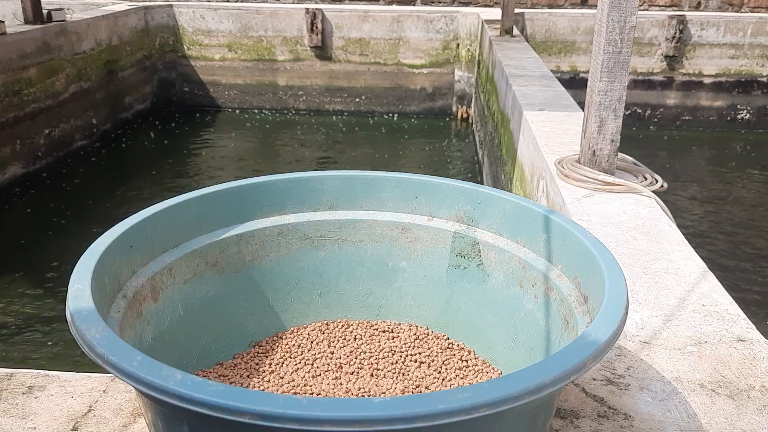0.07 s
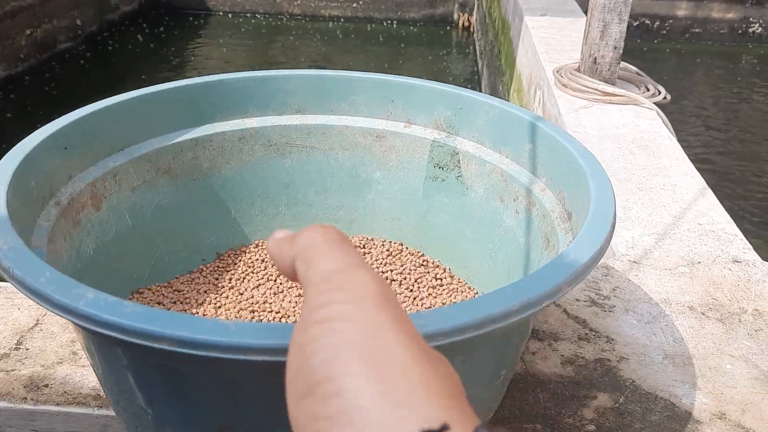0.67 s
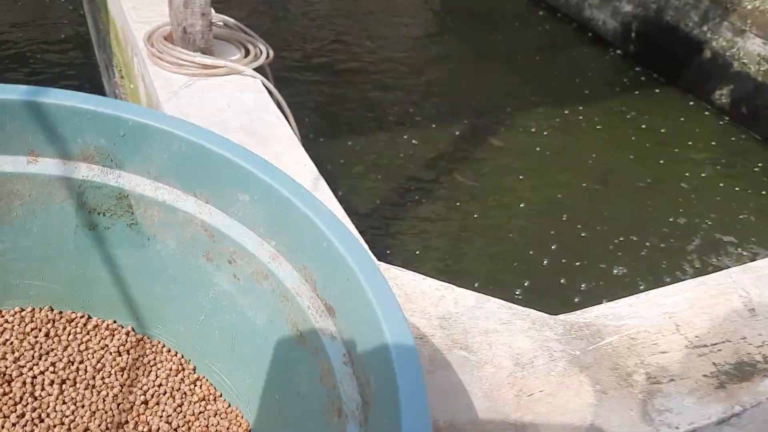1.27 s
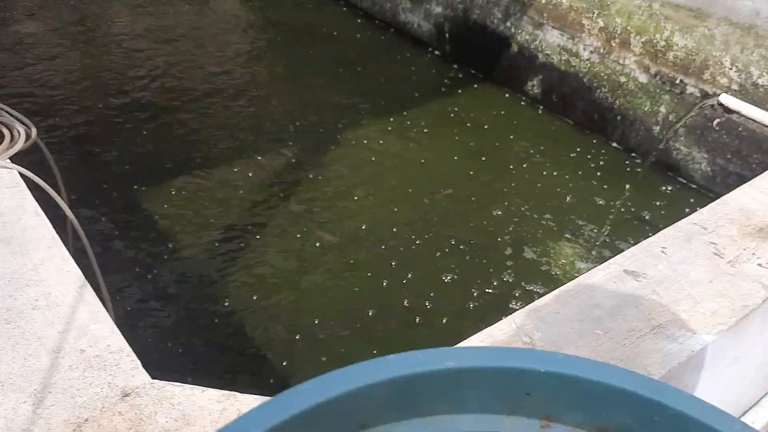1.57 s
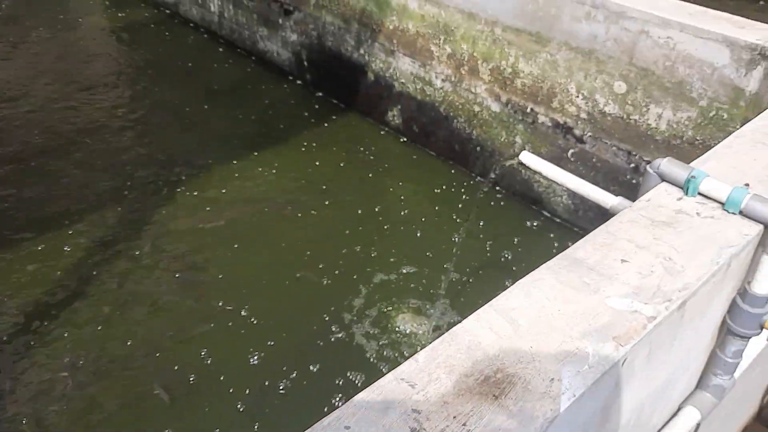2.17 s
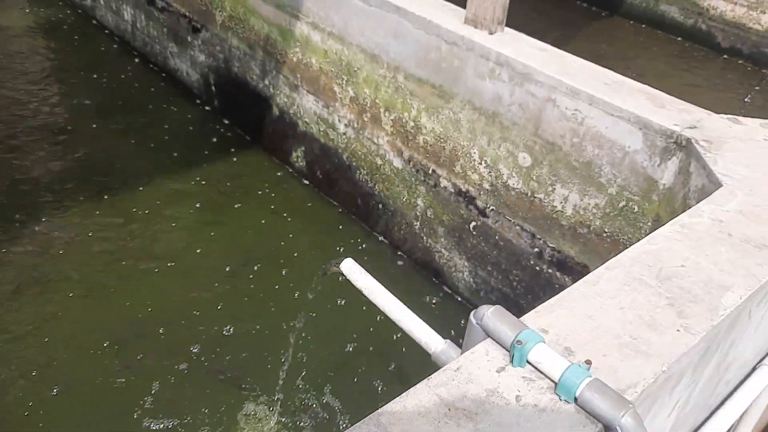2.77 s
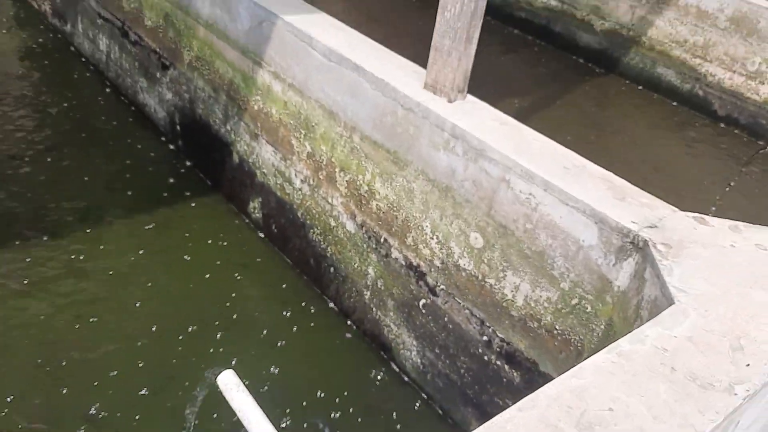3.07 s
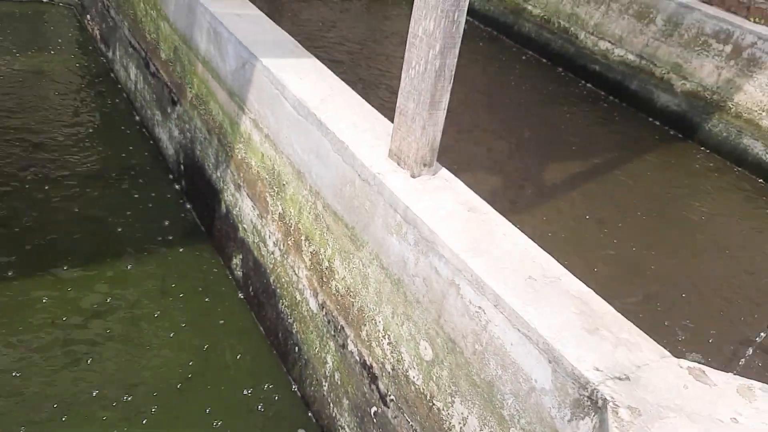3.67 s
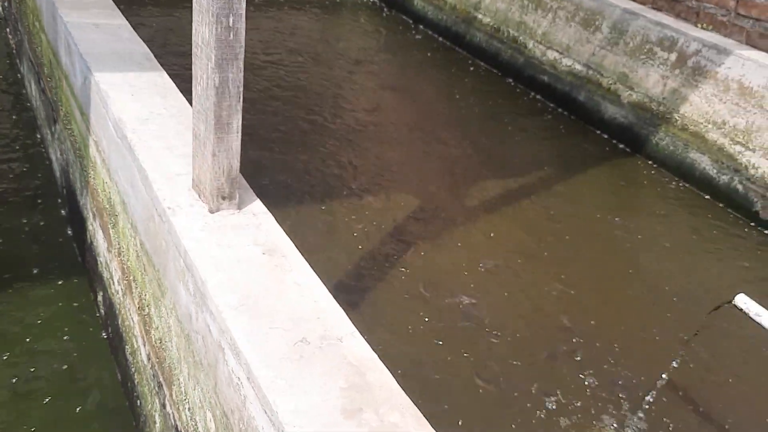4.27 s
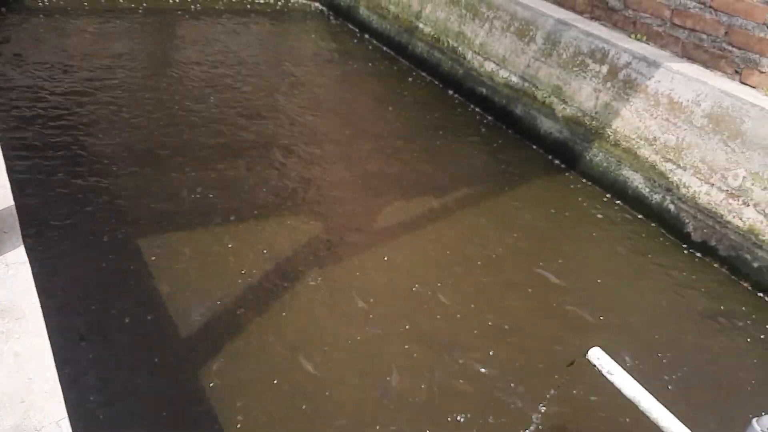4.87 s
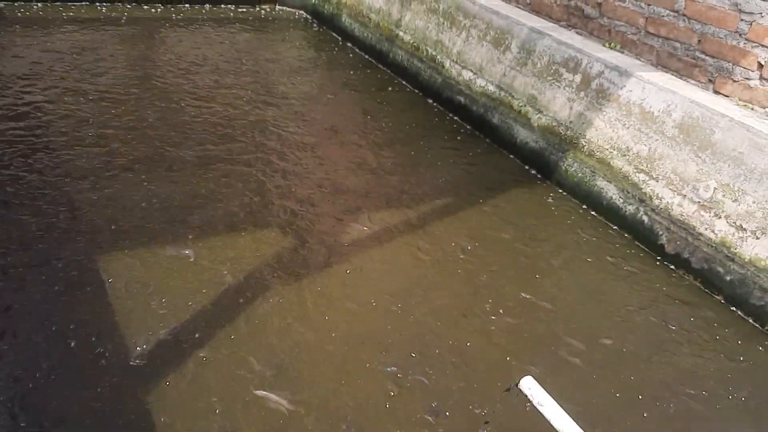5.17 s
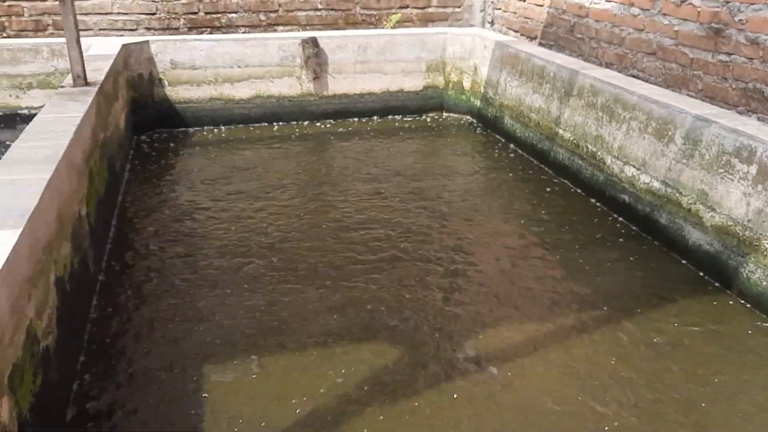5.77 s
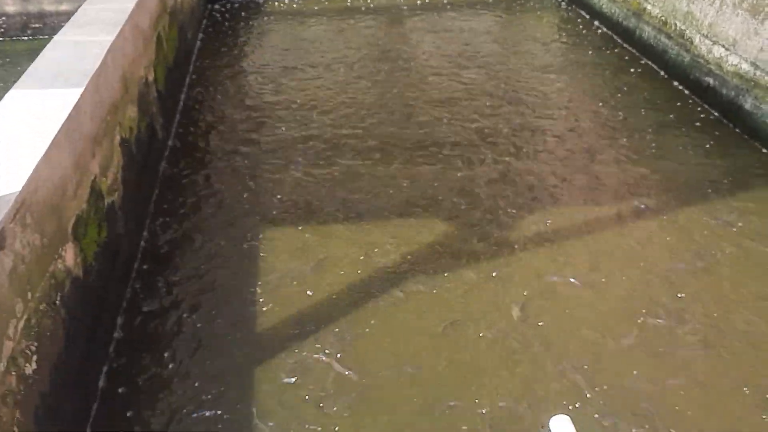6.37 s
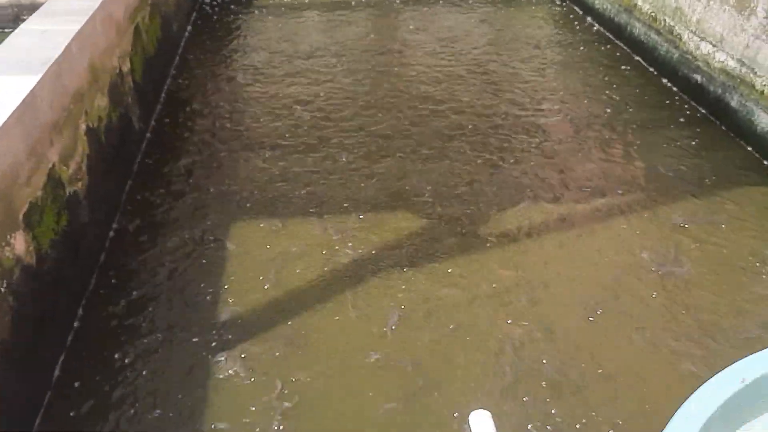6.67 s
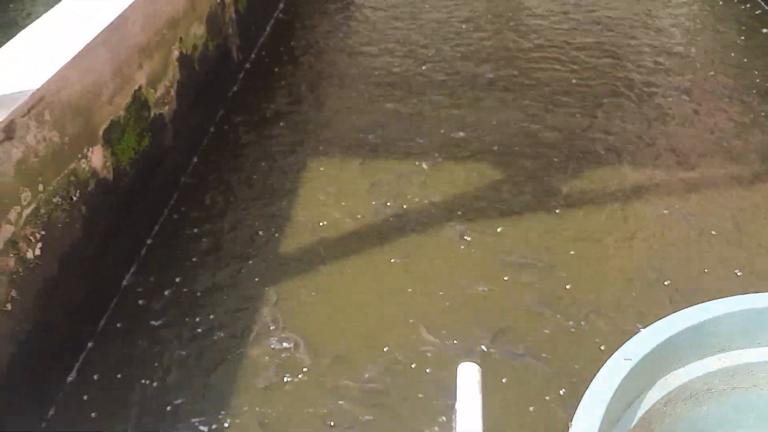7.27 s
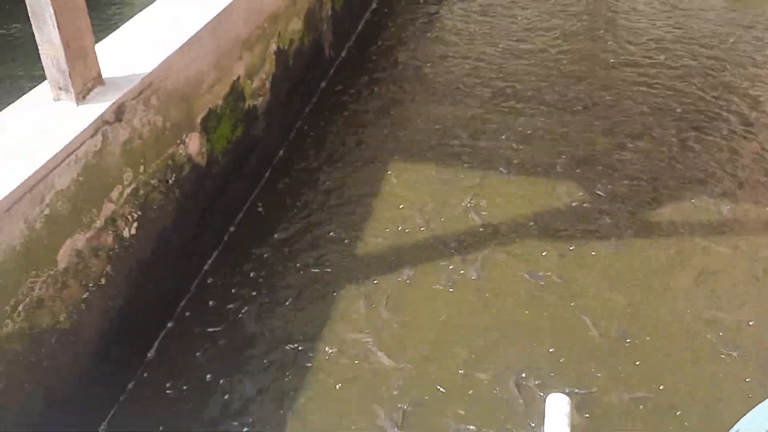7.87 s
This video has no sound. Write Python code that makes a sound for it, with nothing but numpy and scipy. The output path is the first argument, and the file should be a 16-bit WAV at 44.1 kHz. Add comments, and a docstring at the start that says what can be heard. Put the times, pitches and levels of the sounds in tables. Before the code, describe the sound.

Water splatters steadily onto outdoor fish ponds, with small plops from feeding fish, a few sparrow chirps and light wind.

```python
"""Outdoor concrete fish ponds

Thin jets from supply pipes patter and churn on the water, and feeding fish plop and slap at the surface.
A sparrow close by chirps three times between the walls; fainter birds call and pumps hum further off.
A hand bumps a plastic feed basin. The phone is carried from a sheltered spot out over the ponds,
where light wind catches mostly the right one of its two microphones."""
import sys
import numpy as np
from scipy import signal
from scipy.fft import rfft, irfft
from scipy.io import wavfile
from scipy.ndimage import map_coordinates

SR = 44100
rng = np.random.default_rng(int(sys.argv[2]) if len(sys.argv) > 2 else 0)


def generate_wav(sig):
    """Save sig (samples, or channels by samples) to the path in sys.argv[1] as 16-bit PCM at SR."""
    pcm = np.round(np.clip(np.atleast_2d(sig).T, -1, 1) * 32767).astype(np.int16)
    wavfile.write(sys.argv[1], SR, pcm)


N = 348831
T = np.arange(N) / SR


def undb(db):
    """Turn decibels into a number to multiply by."""
    return 10 ** (np.asarray(db) / 20)


def unit(x):
    """Scale a sound to an average power of 1."""
    return x / np.sqrt(np.mean(x ** 2))


def curves(table):
    """Join the rows of a table with straight lines in time, giving one curve per value column."""
    times, *columns = np.transpose(table)
    return [np.interp(T, np.sort(times), column) for column in columns]


def add(track, start_s, sound):
    """Mix a sound into a track at the given time."""
    i = max(int(start_s * SR), 0)
    track[..., i:i + sound.shape[-1]] += sound[..., :max(N - i, 0)]


def response(tone, size=4096):
    """Make a filter from rows of (frequency [Hz], gain [dB]); played alone, it is a click of that tone."""
    hz, db = np.transpose(tone)
    grid_hz = np.maximum(np.arange(size // 2 + 1) * SR / size, 1)
    gain = undb(np.interp(np.log(grid_hz), np.log(hz), db))
    cepstrum = irfft(np.log(gain))
    cepstrum[1:size // 2] *= 2  # folded in half so that nothing rings before the click
    cepstrum[size // 2 + 1:] = 0
    return irfft(np.exp(rfft(cepstrum)))


def through(x, impulse_response):
    """Pass each channel through a filter or an echo."""
    return signal.fftconvolve(np.atleast_2d(x), np.atleast_2d(impulse_response), axes=1)[:, :N]


def fade(t, t60):
    """Die away, dropping 60 dB every t60 seconds."""
    return np.exp(-np.log(1000) * t / t60)


def burst(t, t60, rise_s):
    """Rise quickly, then die away."""
    return fade(t, t60) * (1 - np.exp(-t / rise_s))


def walk(rate, size=N):
    """A smooth random wobble, roughly 1 either way, that changes rate times a second."""
    place = np.arange(size) * rate / SR
    return map_coordinates(rng.standard_normal(size // 4 + 8), [place], order=2, mode="wrap")


def impacts(rate, spread_db):
    """About rate random clicks a second, many small and a few large."""
    hits = rng.random(N) < rate / SR
    size = np.minimum(rng.exponential(size=N), 5)
    return hits * undb(spread_db * size) * rng.choice([-1, 1], N)


def walls(x, echo_db, t60=0.25):
    """The concrete tanks add a short echo, different at each microphone."""
    t = T[:SR // 2]
    echo = rng.standard_normal((2, len(t))) * burst(t, t60, rise_s=0.0019)
    paths = undb(echo_db) * unit(echo) / np.sqrt(len(t))
    paths[:, 0] += 1  # the sound that arrives directly
    return through(x, paths / np.sqrt(1 + undb(2 * echo_db)))


def all_round(x, mic_gap_m=0.14):
    """Sound from every direction is alike at both microphones in the bass and unrelated in the treble."""
    hz = np.arange(N // 2 + 1) * SR / N
    likeness = np.sinc(2 * hz * mic_gap_m / 343)  # sound travels at 343 m/s
    mid = irfft(rfft(x[0] + x[1]) * np.sqrt(1 + likeness), N)
    side = irfft(rfft(x[0] - x[1]) * np.sqrt(1 - likeness), N)
    return np.array([mid + side, mid - side]) / 2


def bubble(t, hz, t60, glide):
    """Air trapped by a drop rings briefly and rises in pitch as it nears the surface."""
    return np.sin(2 * np.pi * hz * t * (1 + glide * t / t60 / 2)) * fade(t, t60)


def bubbles(count=3600, spread_db=2.0, cycles=13):
    """Many small bubbles ring at random times and pitches."""
    out = np.zeros((2, N))
    for when, pitch, size, life, lag in rng.random((count, 5)):
        hz = 550 * 12 ** pitch
        t60 = cycles * (.5 + life) / hz
        ring = bubble(T[:int(t60 * SR)], hz, t60, glide=0.45)
        ring *= hz * undb(-spread_db * np.log(size + 0.042))
        add(out[0], when * N / SR, ring)
        add(out[1], when * N / SR + (lag - .5) * .0009, ring)  # a little early or late on the right
    return unit(out)


# The jets grow louder as the phone nears them: (time [s], patter level [dB], churning level [dB])
JET_LEVELS = [(.1, -57, -67.5), (.72, -58.5, -76), (1.25, -50, -56.5), (1.5, -42, -48.5),
              (1.95, -40, -45.5), (2.6, -38, -45), (3.3, -38, -42.5), (3.6, -35.5, -40), (4.05, -38, -43.5),
              (4.5, -37, -41.5), (5.15, -40.5, -45), (5.9, -37.5, -41), (6.55, -39.5, -43.5),
              (6.98, -36, -37), (7.4, -39, -43), (7.74, -39, -43), (7.88, -31.5, -32.5)]
# The tone of drops landing on water: (frequency [Hz], gain [dB])
PATTER_TONE = [(260, -32), (450, -4), (580, -4.5), (781, -5), (1050, -7.5), (1720, -4.5), (1990, -3.5),
               (3120, -9), (3960, -7), (5740, -14), (6970, -10), (8450, -23.5), (12800, -15), (15100, -25),
               (15800, -18.5)]
def patter(level_db, close_db=-34.5, dulling=0.27):
    """The jets break into drops: dense clicks and bubbles over the wash of the further ponds."""
    clicks = unit(np.array([impacts(rate=2500, spread_db=5.5) for _ in range(2)]))
    wash = rng.standard_normal((2, N)) * undb(2.1 * walk(25))
    drops = undb(-3) * clicks * undb(2 * walk(30)) + undb(-4) * bubbles()
    # from further away the single drops blur into the wash and the treble dulls
    drop_share = 0.93 * undb(np.minimum(level_db - close_db, 0) / 2)
    wash_share = np.sqrt(np.maximum(1 - drop_share ** 2, .1))
    blend = drop_share * unit(walls(drops, echo_db=0.5)) + wash_share * wash
    sound = unit(through(all_round(blend), response(PATTER_TONE)))
    body = signal.sosfilt(signal.butter(1, 3500, fs=SR, output="sos"), sound)
    treble = (sound - body) * undb(dulling * (level_db - close_db) + 0.51 * walk(9))
    return (body + treble) * undb(level_db + .5 * walk(10))


# The bright tone of one drop landing nearby: (frequency [Hz], gain [dB])
TICK_TONE = [(800, -10), (3000, -3), (7000, 14.5), (9000, -1), (13000, 9.5), (16000, 0)]
def stray_drops(patter_db, below_patter_db=18.5):
    """Stray drops from the jets tick at random on the water close by."""
    t = T[:SR // 50]
    tick = rng.standard_normal((2, len(t))) * burst(t, t60=.008, rise_s=.0006)
    ticks = through(impacts(rate=22, spread_db=3.5), tick)
    bright = through(ticks, response(TICK_TONE))
    return unit(walls(bright, echo_db=-8.5)) * undb(patter_db - below_patter_db)


# The deep tone of churning water: (frequency [Hz], gain [dB])
CHURN_TONE = [(76, -38), (130, -9), (161, -12), (199, -3), (274, 1), (339, 1.5), (398, -4.5), (560, -13),
              (730, -39), (1230, -120)]
def churning(level_db):
    """Water churns where the jets plunge in, sounding nearly the same on both sides."""
    shared = unit(impacts(rate=260, spread_db=2.5)) + undb(-5) * rng.standard_normal(N)
    stereo = shared + undb(-8) * rng.standard_normal((2, N))
    return unit(through(stereo, response(CHURN_TONE))) * undb(level_db)


# The pitches at which distant pumps ring: (pitch [Hz], width [Hz], level [dB])
PUMP_TONES = [(261, 15, -71.5), (399, 34, -66.5), (1524, 60, -75), (2030, 93, -68), (2450, 550, -70),
              (3890, 230, -72.5), (5800, 50, -80)]
def far_pumps():
    """The pump housings give off a low hum and a thin, unsteady whine."""
    out = 0
    for hz, width_hz, db in PUMP_TONES:
        housing = signal.iirpeak(hz, hz / width_hz, fs=SR)
        # only the low pitches are alike on both sides
        shaking = rng.standard_normal(N) + hz / 1200 * rng.standard_normal((2, N))
        out = out + unit(signal.lfilter(*housing, shaking)) * undb(db)
    return out


# The nearest pump swells and fades as the phone passes it: (time [s], level [dB])
NEAR_PUMP_LEVELS = [(.7, -73), (1.05, -63), (1.9, -48), (2.5, -50.5), (3.5, -49.5), (5, -62)]
def near_pump(hz=251.3, width_hz=33):
    """One pump housing drones at a single low pitch."""
    housing = signal.butter(2, [hz - width_hz / 2, hz + width_hz / 2], "band", fs=SR, output="sos")
    drone = unit(signal.sosfilt(housing, rng.standard_normal(N)))
    return drone * undb(curves(NEAR_PUMP_LEVELS)[0])


def feed_basin(grip_s=.772, ring_hz=390, width_hz=70):
    """A hand takes hold of the plastic basin: the pellets shift and its wall gives a soft hollow bump."""
    out, t = np.zeros((2, N)), T[:SR // 4]
    touch = burst(t, t60=0.17, rise_s=0.0039)
    rustle = response([(1200, -18), (5000, -2), (7000, -6), (9000, -12), (14000, -13)])
    pellets = through(rng.standard_normal((2, len(t))), rustle)[:, :len(t)]
    plastic = signal.iirpeak(ring_hz, ring_hz / width_hz, fs=SR)
    bump = signal.lfilter(*plastic, rng.standard_normal(len(t)))
    add(out, grip_s, unit(pellets) * touch * undb(-53))
    add(out, grip_s + .015, unit(bump) * touch * undb(-48))
    return out


# The tones in a clear bird whistle: (frequency [times the pitch], level [dB])
WHISTLE_TONES = [(1, -0.5), (2, -9), (3, -12.5)]
# The in-between tones of a raspy voice: (frequency [times the pitch], level [dB])
RASP_TONES = [(.5, -7.5), (1.5, -7.5), (2.5, -9.5), (3.5, -18)]
# How the beak shapes the sound: (frequency [Hz], gain [dB])
BEAK_TONE = [(1000, -50), (2100, -3), (2700, 3.5), (4000, 2), (6200, -2), (8000, -5), (9600, -12.5),
             (12500, -1), (15500, -21)]
def song(notes, jitter, shimmer_db, trill, hiss_db, trill_hz=210, attack_s=0.0077, release_s=0.0044):
    """Each side of a bird's voice box slides onto a pitch and whistles; pushed hard, it turns raspy."""
    out = np.zeros(N)
    breath = response([(1500, 6.5), (2500, 9), (6000, 7), (8500, -38), (14000, -1)])
    hiss = unit(through(rng.standard_normal(N), breath))[0]
    for start, length, first_hz, held_hz, slide_s, db, fade_db, first_rasp, last_rasp in notes:
        t = T[:int(length * SR)]
        drift, shake, flutter = (walk(rate, size=SR // 2)[:len(t)] for rate in (157, 1500, 1500))
        rasp = np.clip(np.linspace(first_rasp, last_rasp, len(t)), 0, 1)
        hz = held_hz + (first_hz - held_hz) * np.exp(-(t / slide_s) ** 2)
        hz *= 1 + .006 * drift
        hz *= 1 + rasp ** 2 * jitter * shake + rasp * trill * np.sin(2 * np.pi * trill_hz * t)
        phase = 2 * np.pi * np.cumsum(hz) / SR
        clear, rough = (sum(undb(level) * np.sin(k * phase) * (k * hz < SR / 2) for k, level in tones)
                        for tones in (WHISTLE_TONES, RASP_TONES))
        air = undb(hiss_db) * hiss[int(start * SR):][:len(t)] * (1 + np.sin(phase / 2))
        voice = clear * (1 - rasp ** 2 / 4) + rasp * (rough + air)
        edges = np.minimum(t / attack_s, 1) * np.minimum((length - t) / release_s, 1)
        level_db = db - fade_db * t / length + shimmer_db * rasp * flutter
        add(out, start, voice * edges * undb(level_db))
    return through(out, response(BEAK_TONE))


# The notes of distant birds: (time [s], length [s], first pitch [Hz], held pitch [Hz], slide time [s],
# level [dB], fade over the note [dB], first rasp [0-1], last rasp [0-1])
FAR_NOTES = [ (.945, 0.059, 5900, 6500, 0.01, -48, -9.5, 0.29, .08),
             (4.98, 0.11, 2510, 2340, 0.029, -50, -2.5, 0.76, 0.83),
             (5.5, 0.078, 2313, 2463, 0.0213, -43.5, 6, 0.79, .8),
             (7.468, 0.053, 4700, 4420, 0.035, -30, 2.5, 0.95, 0.49),
             (7.518, 0.027, 6400, 6250, .014, -22.5, 19, 0.65, 0.9),
             (7.53, 0.048, 3300, 2985, .02, -38.5, -1.5, 0.63, 0.92)]
def far_birds():
    """Calls from further off arrive mostly as echo."""
    calls = song(FAR_NOTES, jitter=0.13, shimmer_db=3, trill=0.042, hiss_db=-2)
    return walls(calls, echo_db=7, t60=0.33)


# Small splashes: (time [s], level [dB], strongest frequency [Hz], fade time [s])
SPLASH_EVENTS = [(1.308, -44.5, 2900, 0.38), (1.92, -37, 1300, .25), (2.7, -37, 1410, .2),
                 (2.925, -27.5, 1380, 0.087), (3.002, -32.5, 2400, 0.3), (3.376, -35, 1400, .08),
                 (4.24, -36, 1600, 0.37), (5.326, -30, 3020, 0.083), (6.03, -33.5, 1990, 0.13),
                 (6.28, -31.5, 2000, .3), (6.885, -38, 1500, 0.21), (6.94, -35.5, 2700, 0.33),
                 (7.879, -33, 2400, 0.22)]
def splashes():
    """Thrown water falls back in a short spatter."""
    out, t = np.zeros((2, N)), T[:SR // 4]
    for start, db, hz, t60 in SPLASH_EVENTS:
        tone = response([(hz / 4, -22), (hz, 0), (hz * 3, -20), (hz * 9, -42)])
        spatter = through(rng.standard_normal((2, len(t))), tone)[:, :len(t)]
        add(out, start, unit(spatter) * fade(t, t60) * undb(db))
    return out


# The light breeze between gusts: (time [s], right level [dB], left level [dB])
BREEZE_LEVELS = [(.1, -89, -88), (1.22, -81, -81), (1.45, -53, -60), (2.1, -54, -54.5), (3.2, -49, -59),
                 (4.4, -43.5, -52), (5.1, -64, -64), (6.5, -66, -68), (7.6, -69, -69)]
# Gusts: (time of the peak [s], length [s], level [dB], left minus right [dB])
WIND_GUSTS = [(1.435, 0.23, -53.5, -33), (1.6, 0.15, -42.5, -17), (1.774, 0.22, -46, 2),
              (2.26, 0.12, -43, -4), (2.7, 0.1, -53, -14), (2.95, .1, -55, -21), (3.57, .16, -39, -21.5),
              (3.738, .26, -48, -1), (3.918, 0.12, -38.5, -11), (4.757, 0.15, -44, -17),
              (5.57, 0.092, -53.5, -18), (5.77, 0.059, -50.5, 12), (6.827, 0.17, -46, -14),
              (6.943, 0.1, -40, -6), (7.004, 0.054, -42, 16), (7.095, 0.26, -53, -6),
              (7.793, .08, -45, -19), (7.89, .12, -49, -5)]
# The low tone of wind on a microphone: (frequency [Hz], gain [dB])
WIND_TONE = [(20, 2), (40, -4.5), (60, 0.5), (110, -3.5), (170, -20.5), (300, -16), (600, -61.5)]
# The hardest swirls of air: (time [s], level [dB])
WIND_THUMPS = [(1.559, -25), (3.573, -26), (4.485, -12.5)]
def wind(gustiness_db=5, thump_hz=105, low_cut_hz=42):
    """Swirling air rumbles at each microphone on its own, and the hardest swirls thump the right one."""
    right_db, left_db = curves(BREEZE_LEVELS)
    power = undb(np.array([left_db, right_db]) + gustiness_db * walk(7.3)) ** 2
    for peak_s, length, db, pan_db in WIND_GUSTS:
        swell = signal.windows.hann(int(length * SR))
        sides_db = db + np.array([[pan_db], [-pan_db]]) / 2
        add(power, peak_s - length / 2, swell * undb(sides_db) ** 2)
    rumble = unit(through(rng.standard_normal((2, N)), response(WIND_TONE))) * np.sqrt(power)
    t = T[:SR // 8]
    thump = np.sin(2 * np.pi * thump_hz * t) * burst(t, t60=0.04, rise_s=0.0044)
    for start, db in WIND_THUMPS:
        add(rumble[1], start, thump / np.abs(thump).max() * undb(db))
    return signal.sosfilt(signal.butter(4, low_cut_hz, "high", fs=SR, output="sos"), rumble)


# The dull tone of a plop, shifted up or down for each fish: (frequency [Hz], gain [dB])
PLOP_TONE = [(50, -9), (130, -7.5), (230, -1), (330, 17), (480, -10), (800, -3.5), (1500, -33), (4000, -63),
             (12000, -58)]
# Fish coming up to feed: (time [s], level [dB], rough pitch [Hz])
FISH_PLOPS = [(1.68, -34, 340), (1.92, -33.5, 360), (2.715, -29.5, 345), (2.92, -28.5, 210),
              (3.607, -23, 226), (3.621, -26, 204), (4.784, -31.5, 225), (4.914, -31, 244),
              (5.349, -29.5, 310), (5.467, -40, 312), (5.585, -29, 342), (5.774, -26.5, 318),
              (5.848, -26.5, 307), (5.918, -24, 327), (5.973, -26, 345), (6.245, -29.5, 288),
              (6.351, -29, 350), (6.443, -25, 336), (6.708, -25, 306), (6.937, -27, 330), (7.022, -24, 303),
              (7.065, -22.5, 313), (7.15, -23.5, 430), (7.243, -22.5, 285), (7.344, -28, 286),
              (7.639, -30, 342), (7.85, -25.5, 280), (7.864, -28, 288), (7.893, -24, 450)]
def fish_plops():
    """A fish breaks the surface, and the hollow it leaves gives one very short ring."""
    out = np.zeros(N)
    for start, db, ring_hz in FISH_PLOPS:
        ring = response([(hz * ring_hz / 320, gain_db) for hz, gain_db in PLOP_TONE])
        add(out, start, ring / np.abs(ring).max() * undb(db))
    return walls(out, echo_db=-10, t60=.2)


# Larger drops: (time [s], level [dB], starting pitch [Hz])
DROP_PLIPS = [(1.692, -31.5, 1090), (2.676, -24.5, 1680), (2.926, -31, 1430), (3.004, -25.5, 3340),
              (3.007, -23, 1040), (3.377, -28, 1240)]
def plips():
    """A larger drop traps one bubble, which rings with a rising pitch."""
    out, t = np.zeros(N), T[:SR // 20]
    for start, db, hz in DROP_PLIPS:
        add(out, start, bubble(t, hz, t60=0.02, glide=0.17) * undb(db))
    return walls(out, echo_db=-7)


# Drops that land close by: (time [s], level [dB])
NEAR_DROPS = [(1.982, -24.5), (2.641, -32), (3.016, -29), (3.1153, -31), (3.417, -34), (3.5223, -30),
              (3.6464, -25), (3.8722, -32), (4.2245, -26), (4.6937, -27.5), (5.211, -32), (5.5667, -29),
              (5.7514, -23), (5.8366, -29), (5.856, -32), (5.976, -31), (6.2344, -28.5), (6.526, -27)]
def near_drops():
    """A single drop hits the water with a bright tick."""
    out, t = np.zeros((2, N)), T[:SR // 4]
    tick_shape = burst(t, t60=.008, rise_s=.0006)
    for start, db in NEAR_DROPS:
        add(out, start, rng.standard_normal((2, len(t))) * tick_shape * undb(db))
    return through(out, response(TICK_TONE))


# The notes of three chirps: (time [s], length [s], first pitch [Hz], held pitch [Hz], slide time [s],
# level [dB], fade over the note [dB], first rasp [0-1], last rasp [0-1])
SPARROW_NOTES = [ (2.219, 0.021, 5330, 4930, 0.0061, -23.5, 5, 1, 1),
                 (2.238, 0.052, 4120, 3950, 0.011, -19.5, 4, 0.5, .55),
                 (2.286, 0.055, 4180, 4300, 0.013, -23, 3, 0.05, 0.4),
                 (2.331, 0.027, 4510, 4980, 0.0064, -12.5, 19, 1, 0.3),
                 (2.358, 0.022, 4250, 3780, 0.017, -20.5, 2.5, .85, 0.94),
                 (2.374, 0.042, 3600, 2850, 0.013, -28, 6, 0.75, .8),
                 (4.294, .014, 5900, 5400, .005, -23, -2, 0.8, .7),
                 (4.325, 0.043, 5300, 4146, .008, -14, 1, 0.66, 0.53),
                 (4.376, 0.039, 4350, 3130, .021, -12, 13, .2, .55),
                 (4.388, 0.076, 6790, 5480, 0.0081, -10.5, 13.5, 0.09, 0.98),
                 (4.473, 0.077, 3495, 4200, .008, -13.5, 11.5, 0.41, 0.88),
                 (4.487, 0.015, 6600, 3500, 0.012, -13, 10, 0.3, 0.8),
                 (7.096, 0.026, 4010, 3750, 0.0108, -31, -8, 0.85, 0.77),
                 (7.117, 0.092, 3750, 3540, 0.021, -24.5, 4, 0.35, .6),
                 (7.127, 0.071, 7150, 5525, .008, -11, 10, 0.34, 0.9),
                 (7.2, 0.059, 5210, 4347, .008, -20.5, -0.5, .4, 0.92),
                 (7.256, 0.023, 6210, 5200, 0.019, -22.5, -1, 0.97, 0.76),
                 (7.275, 0.053, 5000, 4630, 0.0095, -16, 6, .35, .15)]
def sparrow():
    """A nearby sparrow's chirps ring between the walls."""
    chirps = song(SPARROW_NOTES, jitter=0.081, shimmer_db=3.5, trill=0.046, hiss_db=-11)
    return walls(chirps, echo_db=3.5, t60=0.27)


# Puffs of fine spray: (time of the peak [s], length [s], level [dB])
SPRAY_PUFFS = [(2.933, 0.24, -51), (5.783, .09, -46), (5.85, 0.082, -41), (6.056, 0.069, -38.5),
               (6.296, 0.15, -37), (6.96, 0.18, -50)]
# The hissy tone of spray: (frequency [Hz], gain [dB])
SPRAY_TONE = [(1200, -14), (2500, -4), (7000, 1), (8700, -13), (12800, -3), (16000, -8)]
def spray():
    """Droplets too small to hear one by one come down in a soft hiss that swells and dies away."""
    swells = np.zeros(N)
    for peak_s, length, db in SPRAY_PUFFS:
        add(swells, peak_s - length / 2, signal.windows.hann(int(length * SR)) * undb(db))
    droplets = np.array([impacts(rate=5200, spread_db=6) for _ in range(2)])
    return unit(through(droplets, response(SPRAY_TONE))) * swells


# Fish slapping the surface close by: (time [s], level [dB], strongest frequency [Hz])
TAIL_SLAPS = [(6.881, -19.5, 400), (6.928, -18, 424), (7.002, -13.5, 637)]
def tail_slaps(swing_hz=345):
    """A tail hits the water flat: one sharp pulse, and a single swing as the dent closes."""
    out, t = np.zeros(N), T[:SR // 40]
    swing = np.sin(2 * np.pi * swing_hz * t) * (t * swing_hz) * fade(t, t60=0.0096)
    for start, db, hz in TAIL_SLAPS:
        tone = [(hz / 6, -22), (hz / 2, -2), (hz, 0), (hz * 2, -11), (hz * 5, -24), (hz * 16, -42)]
        for part in (response(tone), swing):
            add(out, start, part / np.abs(part).max() * undb(db))
    return walls(out, echo_db=-10, t60=.2)


def scene():
    """Mix the water, fish, basin, pumps, wind and birds."""
    patter_db, churn_db = curves(JET_LEVELS)
    jets = patter(patter_db) + stray_drops(patter_db) + churning(churn_db)
    surface = fish_plops() + plips() + tail_slaps()
    falling_water = walls(near_drops() + splashes(), echo_db=-2.5) + spray()
    water = jets + surface + falling_water
    return water + feed_basin() + far_pumps() + near_pump() + wind() + sparrow() + far_birds()


# The two microphones hear the treble differently: (frequency [Hz], left minus right [dB])
MIC_BALANCE = [(1200, -1), (2400, 1.5), (4400, -1), (8100, -6), (11000, 3.5), (14000, 3.5)]
def record(dry, start_s=.068, fade_in_s=.012, top_hz=16000):
    """The phone starts listening after a moment; each microphone shapes the tone, and the top is cut."""
    mics = [response([(hz, side * db / 2) for hz, db in MIC_BALANCE]) for side in (1, -1)]
    sound = through(dry, mics) * np.clip((T - start_s) / fade_in_s, 0, 1)
    return signal.sosfilt(signal.ellip(10, .2, 80, top_hz, fs=SR, output="sos"), sound)


dry = scene()
out = record(dry)
generate_wav(out)
```